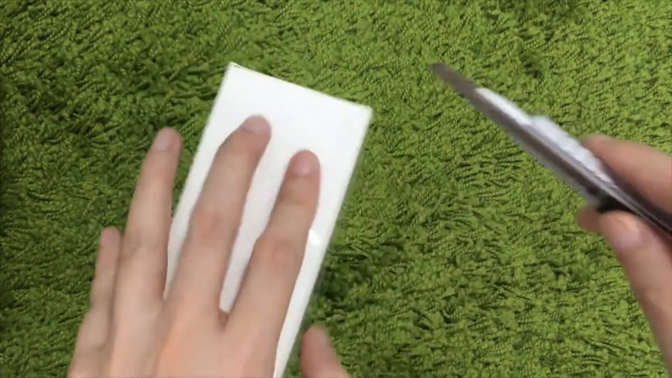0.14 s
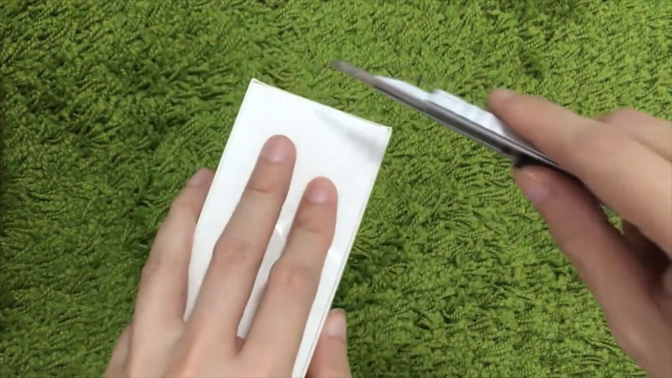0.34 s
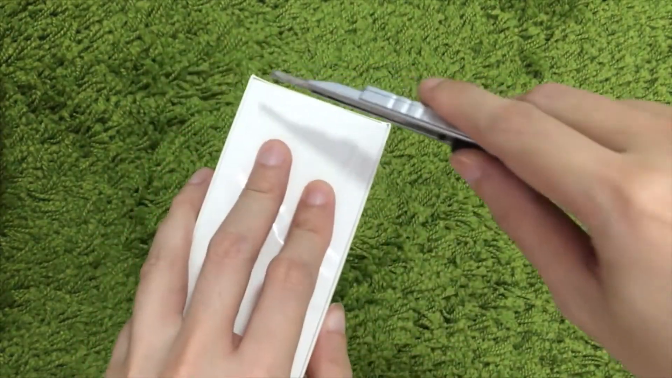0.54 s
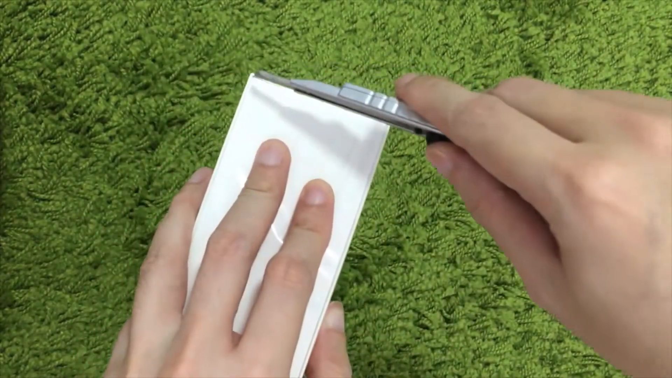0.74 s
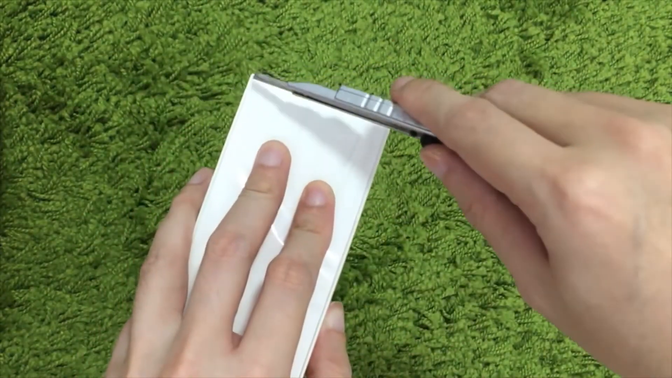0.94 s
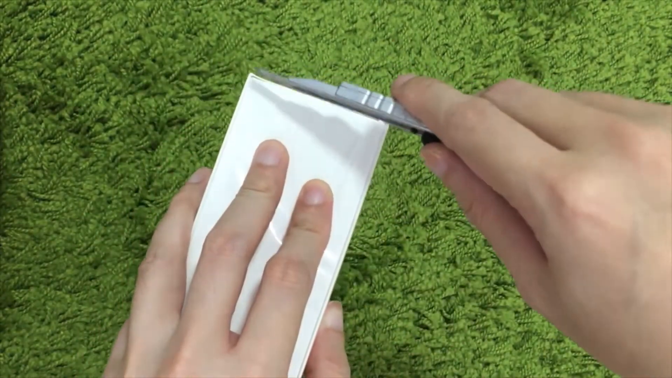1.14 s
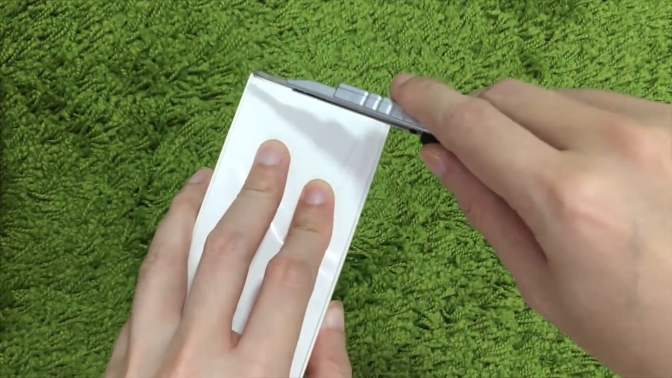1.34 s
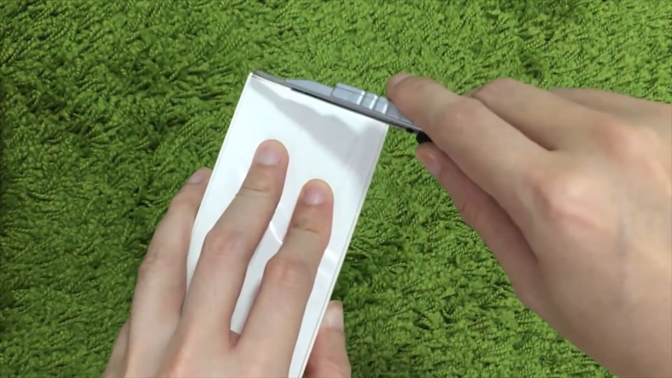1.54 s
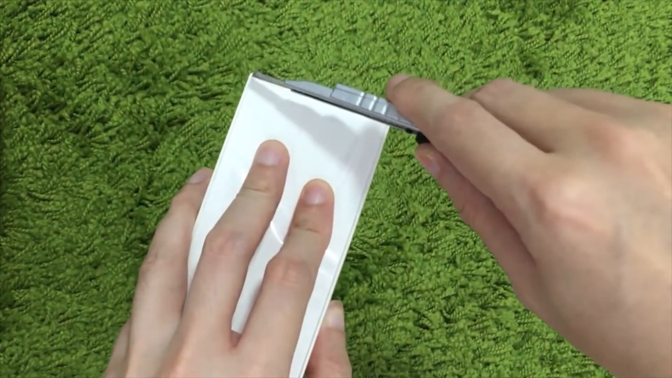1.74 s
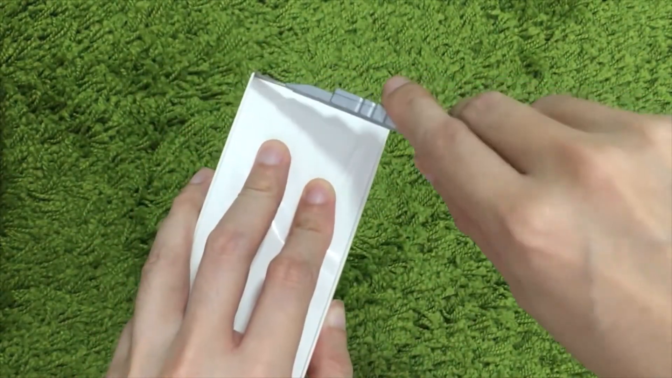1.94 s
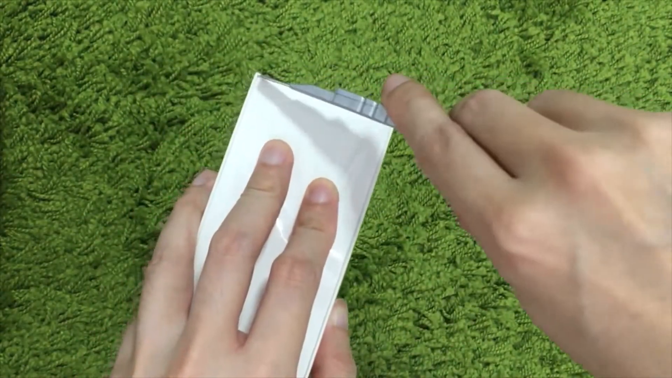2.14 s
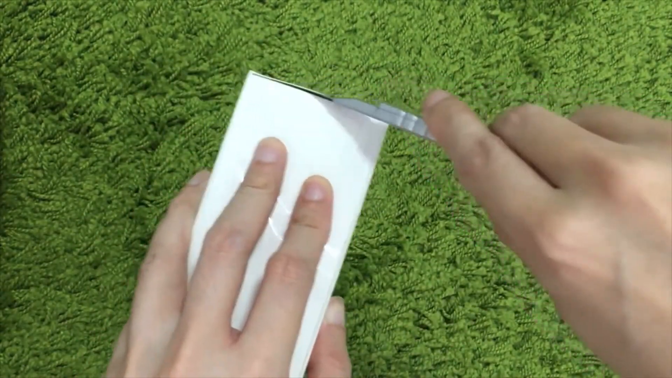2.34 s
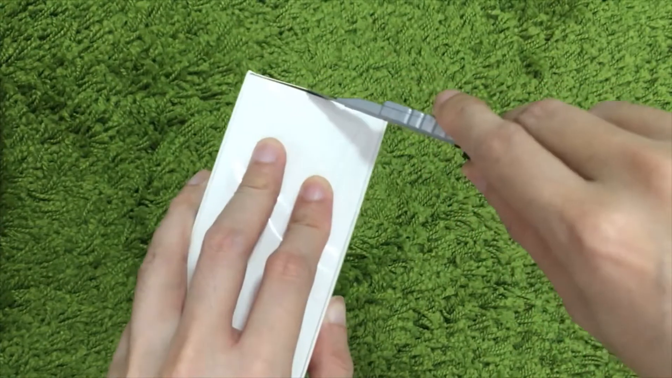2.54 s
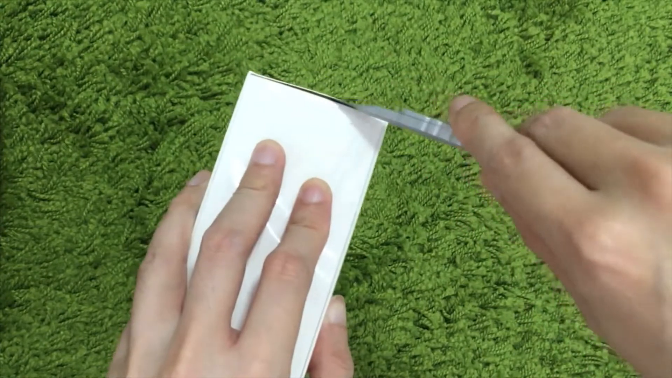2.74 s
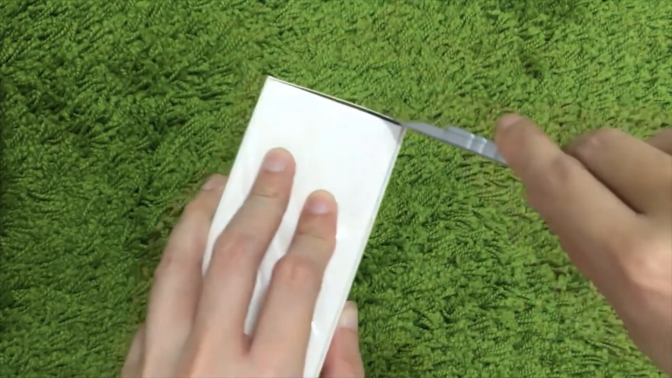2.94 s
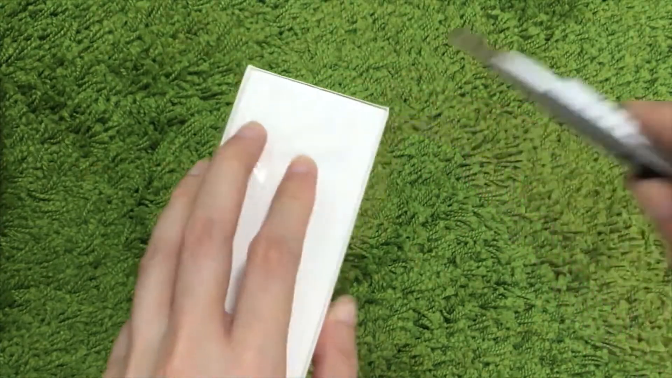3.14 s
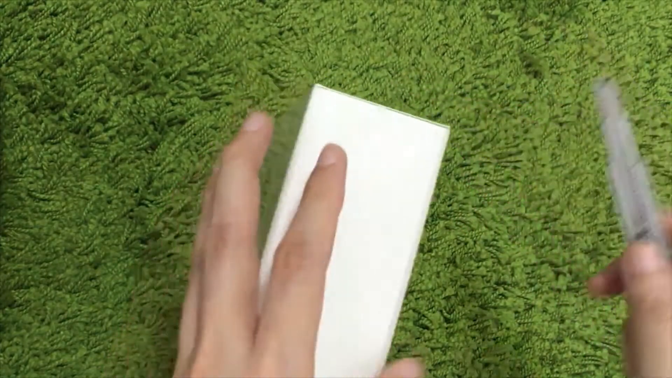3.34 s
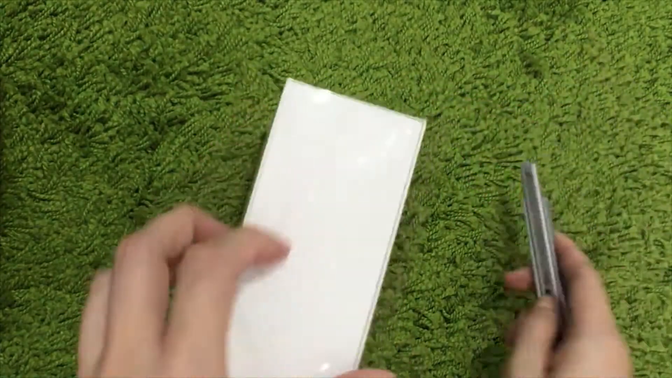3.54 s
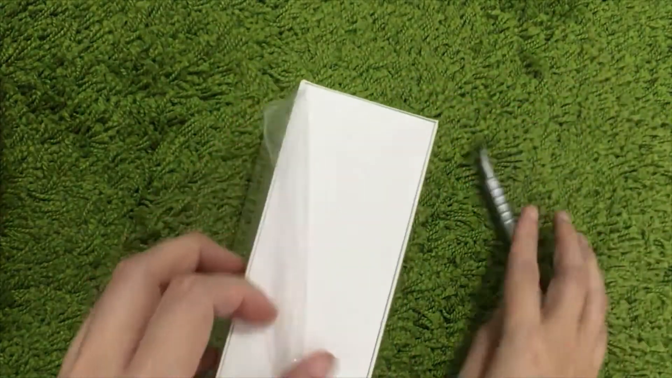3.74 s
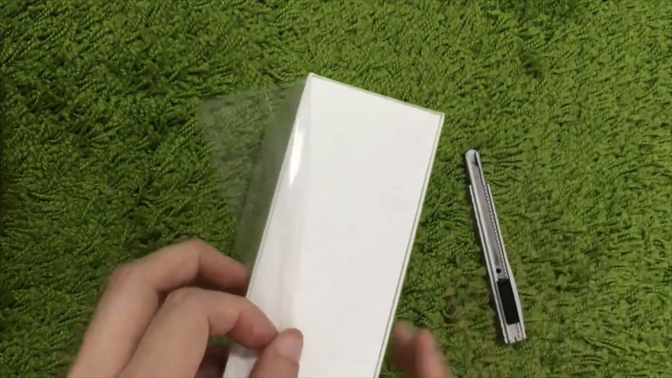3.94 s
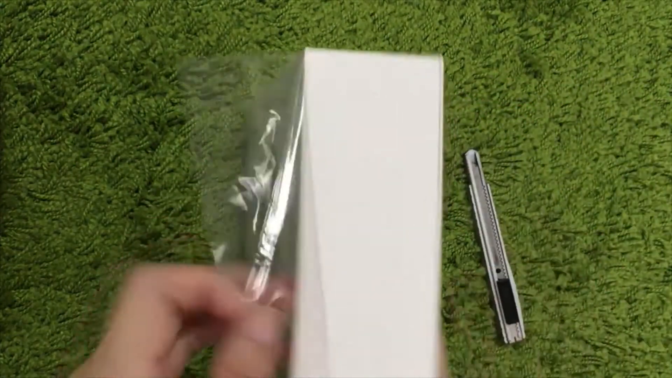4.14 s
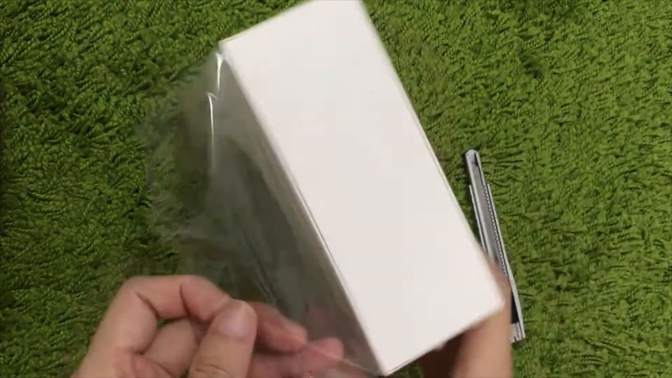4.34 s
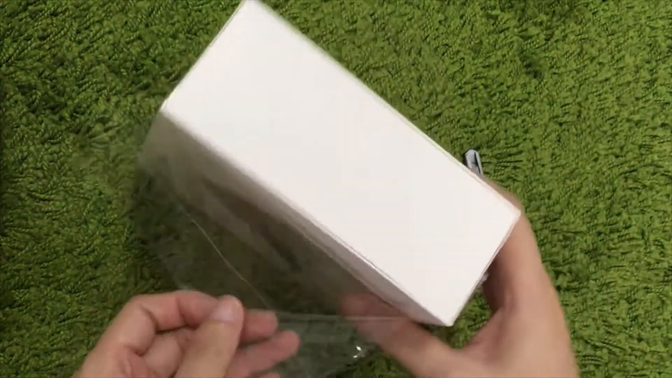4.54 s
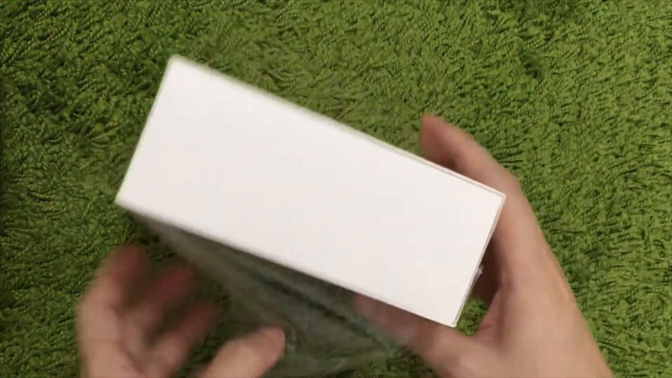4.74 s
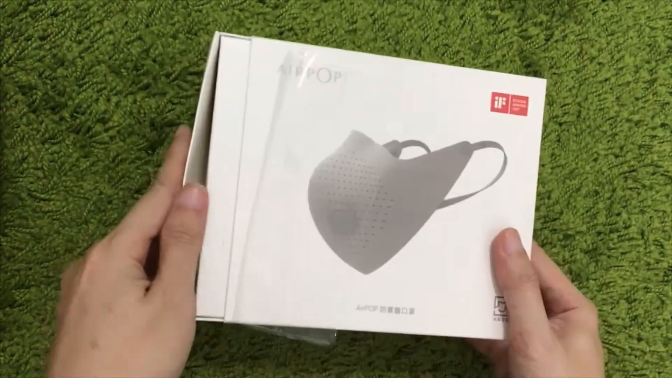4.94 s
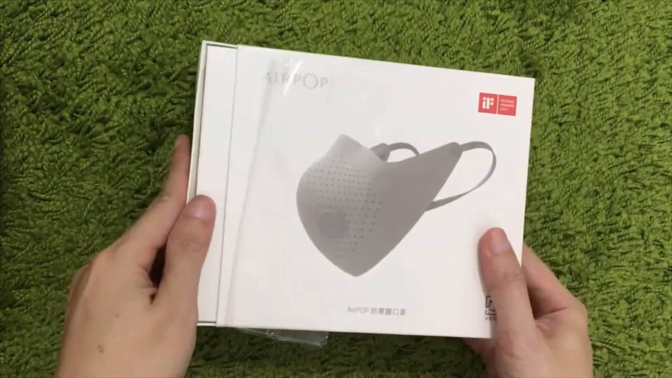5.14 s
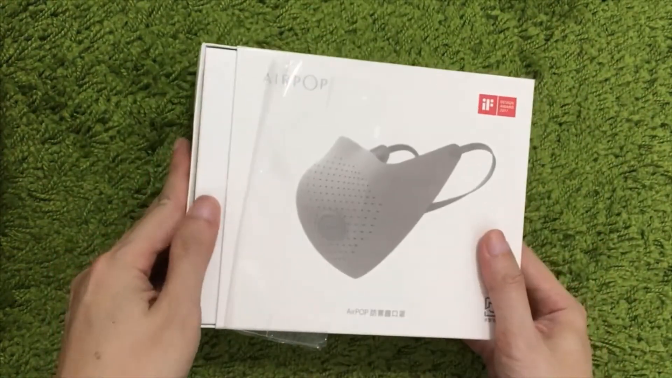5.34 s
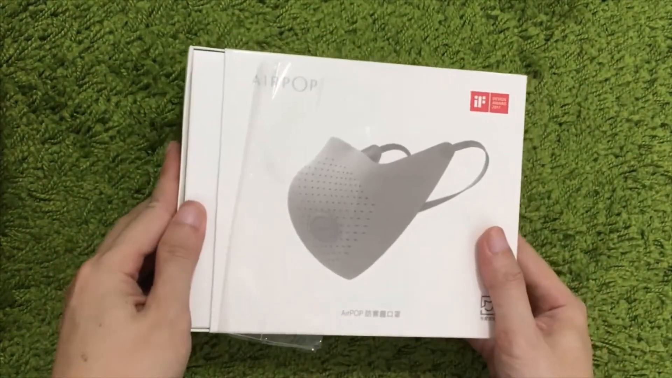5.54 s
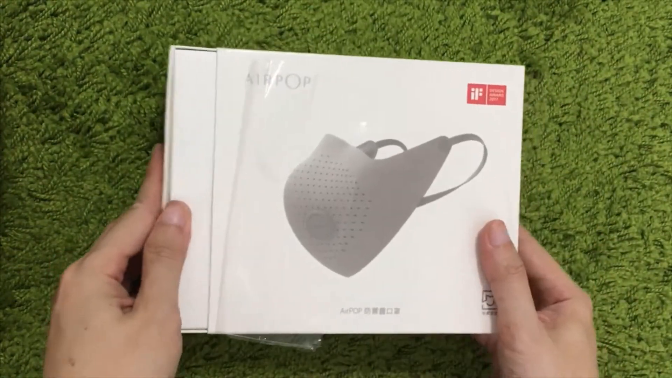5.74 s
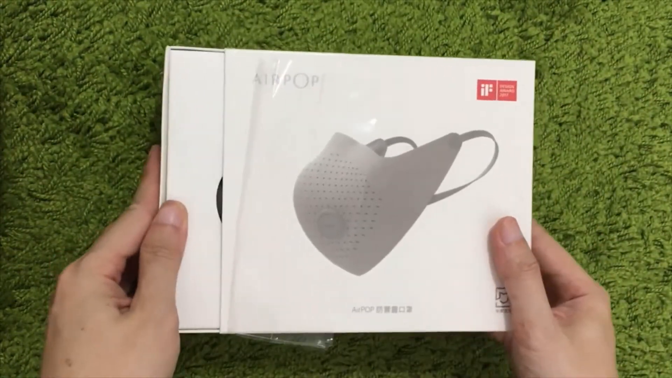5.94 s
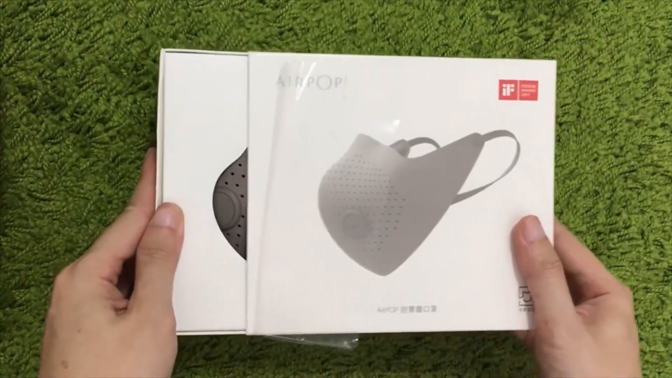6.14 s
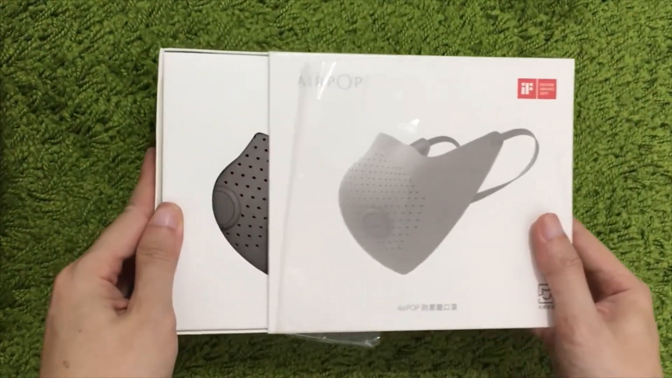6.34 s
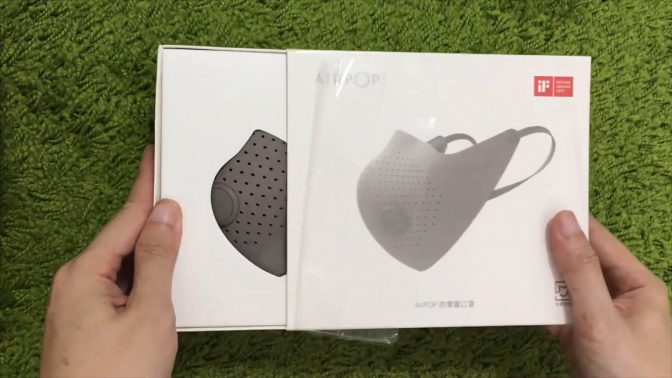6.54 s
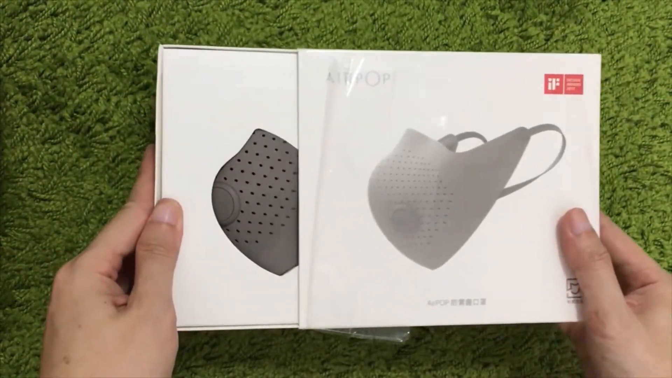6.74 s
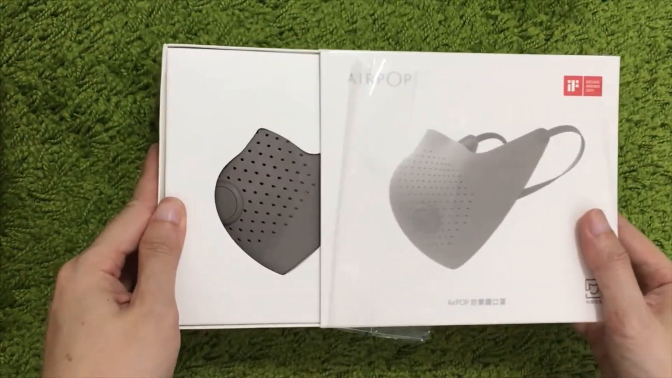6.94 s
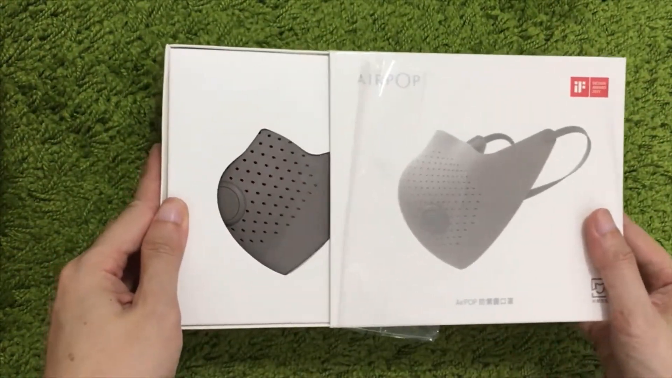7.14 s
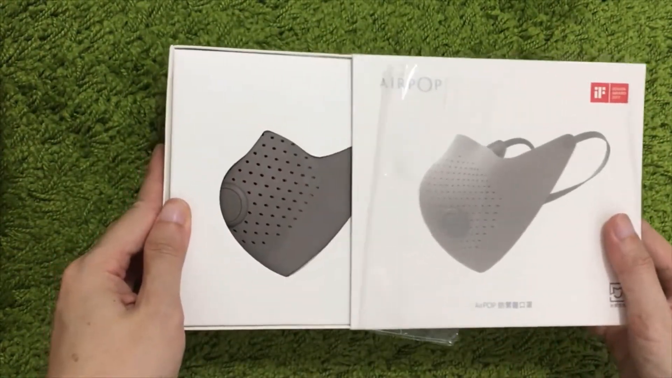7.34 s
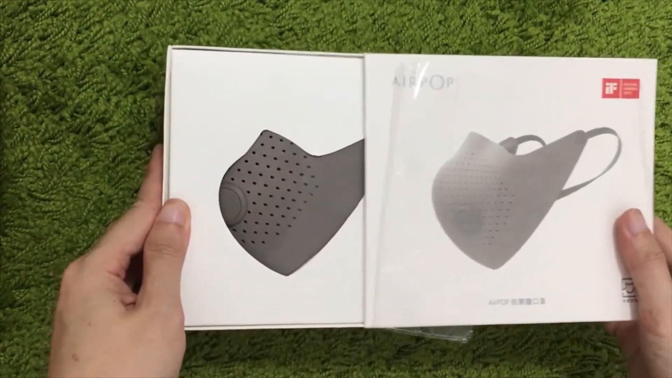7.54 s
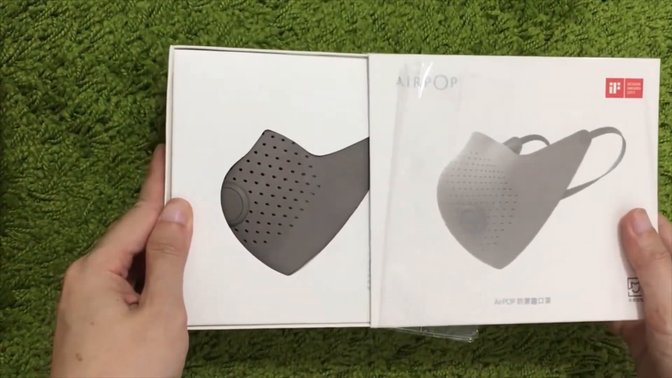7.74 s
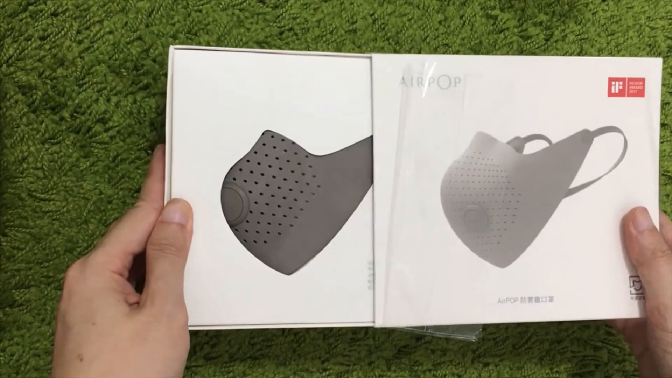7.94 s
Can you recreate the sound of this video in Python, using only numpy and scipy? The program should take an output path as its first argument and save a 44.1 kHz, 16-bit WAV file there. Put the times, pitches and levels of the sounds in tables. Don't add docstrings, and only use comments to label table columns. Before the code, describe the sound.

A close microphone in a small, quiet room picks up soft hiss and a deep traffic drone that swells and fades. At 0 s there is a dull thump with a small crunch, then mostly quiet with faint ticks, one short metallic ring near 1 s. Around 1.85-1.95 s small snaps appear; at 2.15-2.25 s a knife sticks and slips in a tight crackling burst, with another at 2.7 s ending in a hard snap at 2.78 s. Light film crackle runs from 3 s. At 3.39-3.51 s the blade slider ratchets in about ten loud, bright clicks, slowing at the end. From 3.6 to 4.8 s plastic film snaps and crackles crisply, strongest near 4.1 s, with muffled box knocks. Distant bird whistles fall at 4.9, 5.3 and 6.0 s. A soft knock comes at 5 s; from 5.7 to 8 s the card sleeve hisses in short, gentle, uneven pushes.

```python
import sys
import numpy as np
from scipy import signal
from scipy.fft import rfft, irfft
from scipy.io import wavfile
from scipy.ndimage import uniform_filter1d

SR = 44100
rng = np.random.default_rng(int(sys.argv[2]) if len(sys.argv) > 2 else 0)


def put_to_file(sound):
    columns = np.atleast_2d(sound).T
    safe = np.clip(columns, -1, 1)
    whole_steps = np.round(safe * 32767)
    wavfile.write(sys.argv[1], SR, whole_steps.astype(np.int16))


def undo_db(level):
    steps = np.asarray(level, float) / 20
    return 10 ** steps


N = 356769


def rms_one(x):
    return x / np.sqrt(np.mean(x ** 2) + 1e-20)


def in_time(rows, outside):
    s, *columns = np.transpose(rows)
    return [np.interp(np.arange(N) / SR, s, column, outside, outside) for column in columns]


def band(x, low_hz, high_hz):
    edges = [low_hz, min(high_hz, .47 * SR)]
    return signal.sosfilt(signal.butter(2, edges, "band", fs=SR, output="sos"), x)


def coloured(x, spectrum):
    hz, db = np.transpose(spectrum)
    bins_hz = np.maximum(np.arange(N // 2 + 1) * SR / N, 1)
    gain = undo_db(np.interp(np.log(bins_hz), np.log(hz), db))
    return rms_one(irfft(rfft(x) * gain, N))


def drift(rate_hz):
    r = np.exp(-32 * np.pi * rate_hz / SR)
    noise = rng.standard_normal(N // 16 + 3002)
    slow = signal.lfilter([1], [1, -2 * r, r * r], noise)[3000:]
    return np.interp(np.arange(N) / 16, np.arange(len(slow)), rms_one(slow))


def ring(x, hz, t60):
    r, w = undo_db(-60 / (t60 * SR)), 2 * np.pi * hz / SR
    return signal.lfilter([0, np.sin(w)], [1, -2 * r * np.cos(w), r * r], x + 1e-18)


def resonance(x, hz, width_hz):
    r = np.exp(-np.pi * width_hz / SR)
    poles = [1, -2 * r * np.cos(2 * np.pi * hz / SR), r * r]
    return signal.lfilter([(1 - r * r) / 2, 0, (r * r - 1) / 2], poles, x)


def bursts(count, length_ms, rise_ms):
    t_ms = np.arange(1800) / SR * 1000
    chance = rng.standard_normal((count, 1801))
    length = length_ms * undo_db(2 * chance[:, :1])
    return chance[:, 1:] * (1 - np.exp(-t_ms / rise_ms)) * np.exp(-t_ms / length)


def grains(per_s, spread_db):
    sizes = undo_db(spread_db * np.minimum(rng.exponential(1, N), 5)) * rng.choice([-1, 1], N)
    return rms_one(sizes * (rng.random(N) < per_s / SR))


def place(times, levels_db, shapes):
    size = shapes.shape[1]
    out = np.zeros(N + size)
    crest = np.sqrt(2 * uniform_filter1d(shapes ** 2, size=40).max(axis=1))
    for s, gain, shape in zip(times, undo_db(levels_db) / crest, shapes):
        start = round(s * SR)
        out[start:start + size] += gain * shape
    return out[:N]


def strikes(table, regions):
    s, *levels = np.transpose(table)
    out = np.zeros(N)
    for db, (low_hz, high_hz, ms, trim_db, modes, t60) in zip(levels, regions):
        burst = bursts(len(s), ms, rise_ms=0.27)
        strengths = undo_db(-32.0 + 1.0 * rng.standard_normal((len(s), len(modes))))
        ringing = sum(strengths[:, [k]] * ring(burst, hz, t60) for k, hz in enumerate(modes))
        out += place(s, db + trim_db, band(burst + ringing, low_hz, high_hz))
    return out


def card(x, panels, wander_db):
    out = np.zeros(N)
    for k, (hz, width_hz, db) in enumerate(panels):
        out += (-1) ** k * undo_db(db + wander_db * drift(25)) * resonance(x, hz, width_hz)
    return rms_one(out)


def narrow_noise(table, levels_db):
    out = np.zeros(N)
    for (start, end, hz, width_hz), db in zip(table, levels_db):
        at, size = round(start * SR), round((end - start) * SR)
        noise = rng.standard_normal(size + SR // 4)
        narrow = resonance(resonance(noise, hz, width_hz), hz, width_hz)[-size:]
        out[at:at + size] += undo_db(db) * signal.windows.tukey(size, .5) * rms_one(narrow)
    return out


# (time [s], crest of blade modes [dB], crest of film [dB])
SEAM_SLIPS = [(2.157, -54, -49), (2.168, -54, -50), (2.1925, -41.5, -38), (2.198, -43, -44),
              (2.2255, -36, -50), (2.231, -37, -48), (2.2385, -34.5, -48), (2.2465, -32, -44),
              (2.698, -52, -56), (2.7108, -46.5, -52), (2.7228, -55, -64), (2.7278, -48, -55),
              (2.7308, -52, -55), (2.735, -49, -58), (2.7458, -54, -58), (2.7528, -51, -56),
              (2.7565, -49, -53), (2.761, -51, -58), (2.7795, -32.5, -36)]
# (low [Hz], high [Hz], burst [ms], trim [dB], ringing modes [Hz], T60 [s])
SEAM_REGIONS = [
    (860, 1100, 1.4, -10, (1030,), 0.016),
    (1620, 2100, 1.5, -4.5, (1880,), 0.015),
    (2840, 3900, 1.1, -1.5, (3150, 3400), 0.011),
    (5500, 7500, .8, -1, (6300, 6900), .006),
]


def slit():
    blade_thrice_then_film = [0, 1, 1, 1, 2]
    return strikes(np.array(SEAM_SLIPS)[:, blade_thrice_then_film], SEAM_REGIONS)


# (low [Hz], high [Hz], burst [ms], trim [dB], ringing modes [Hz], T60 [s])
SNAP_REGIONS = [
    (1020, 2600, 0.99, -1.5, (1360, 2500), 0.0067),
    (2440, 3870, 0.94, -2, (2560, 3230, 3700, 4400), 0.01),
    (4400, 7160, 0.57, -1, (7200, 11000, 4700), 0.006),
    (8050, 19000, 0.81, 7, (10000, 20000), 0.0046),
]
# (time [s], crest [dB], centre [octaves above the card panel region])
BOX_JOLTS = [(.017, -30.5, 1.2), (.0884, -47.5, .1), (.2456, -51.5, 1.7), (1.8636, -58, .5),
             (2.1964, -41, 1.6), (2.2304, -36, 1.5), (2.2385, -33.5, 1.5), (2.2463, -37, 0.45),
             (2.7792, -24, 2.36), (3.003, -58, 1.5), (3.1645, -44, 3.1), (3.2217, -43.5, 3.4),
             (3.308, -54, 1.6), (3.9732, -26, 4), (3.9814, -26.5, 2.6), (4.0058, -42, 0.6),
             (4.1116, -23, 2.9), (4.1133, -22.5, 2.5), (4.1238, -30, 2.5), (4.162, -33.5, 2.7),
             (4.2461, -38, 1.5), (4.3012, -35.5, 1.1), (4.3534, -35, 2.9), (4.411, -42.5, .1),
             (4.6946, -35.5, 1.9), (4.8273, -48.5, 0.087), (4.944, -50, .1), (4.976, -54, 0.18),
             (5.729, -43.5, .1), (5.956, -46, .1), (3.113, -59, 2), (3.1925, -48, 0.42), (3.2545, -57, 1.5),
             (4.4525, -48, 1.7), (4.7895, -52, 2.5), (5.8, -57, 0.29), (4.2975, -45, 1.1),
             (4.423, -49, 1.7)]
# (time [s], crest [dB], centre [octaves above card panel])
FILM_CRACKS = [(1.8466, -45, 1.9), (1.9097, -36, 1.8), (2.167, -42, 2.4), (2.1929, -33, 2),
               (2.2254, -36, 1.2), (2.797, -42, 1.6), (2.9968, -51, 1.7), (3.0115, -41, 2),
               (3.0782, -38, 2.8), (3.2073, -39, 3), (3.6903, -28, 2.76), (3.6951, -34, 2.5),
               (3.7165, -39, 1.2), (3.7357, -25, 3.1), (3.8062, -32.5, 3.3), (3.934, -40, 3.3),
               (3.957, -39, 1), (3.965, -38, 3.8), (4.0373, -50, 1.9), (4.1446, -38, 2.6),
               (4.315, -36, 3.1), (4.3316, -27, 2.3), (4.4895, -40, 0.13), (4.6048, -39.5, 1.5),
               (4.7557, -36, 1.5), (4.7621, -38, 1), (4.7753, -50, 1.4), (5.7043, -43, 1.5),
               (6.1687, -54, 0.075), (6.174, -56, .1), (7.602, -51.5, 2.5), (3.0265, -48, 2),
               (3.065, -49, 1.4), (3.1005, -50.5, 3.3), (4.1405, -38, 2.2), (4.1265, -32, 2.8),
               (4.3115, -46, 1.5), (4.4665, -50, 2.4), (4.6865, -53, 1.2), (4.767, -44, 2.8),
               (4.7815, -46, 1.8), (2.1455, -58, 2.3), (3.877, -54, 2.8), (3.922, -48, 3.1),
               (3.961, -40.5, 2.8)]
# (time [s], crest [dB], centre [octaves above card panel])
FILM_TICKS = [(.2095, -41.5, 2.6), (.972, -52, 2.6), (1.8544, -53, 1.7), (1.9396, -50.5, 1.1),
              (2.156, -46, 1.7), (2.402, -58, 1.6), (2.525, -58, 1.7), (2.5517, -60, 0.99),
              (2.759, -45, 2.2), (2.8328, -45.5, 2.9), (3.0226, -43, 2.4), (3.0398, -41.5, 2.9),
              (3.0929, -48, 2.9), (3.1156, -45, 2.9), (3.1442, -50, 3.1), (3.174, -44.5, 2.5),
              (3.329, -38, 2.3), (3.576, -25, 2.93), (3.656, -46, 1.6), (3.7239, -27, 3.4),
              (3.816, -33, 1.84), (3.9068, -35.5, 2), (3.941, -35.5, 2.9), (4.226, -47, 1),
              (4.2797, -42, 2.9), (4.3414, -39, 2.9), (4.381, -36, 3.1), (4.3866, -41.5, 2.9),
              (7.8165, -54.5, 0.84), (4.2365, -48, 3.3), (4.328, -52, 2.3), (4.432, -54, 2.3),
              (4.7415, -45, 2.9), (4.7725, -51, 2.6), (3.0605, -47, 3.2)]
# (below [dB per octave], above [dB per octave])
JOLT_LOSS, CRACK_LOSS, TICK_LOSS = (3.7, 3.6), (9, 9.8), (18, 7.2)


def snap_levels(table, loss):
    s, db, centre = np.transpose(table)
    away = np.arange(len(SNAP_REGIONS))[:, None] - centre
    return np.transpose([s, *(db - np.maximum(-away * loss[0], away * loss[1]))])


def snaps():
    jolts = snap_levels(BOX_JOLTS, JOLT_LOSS)
    cracks = snap_levels(FILM_CRACKS, CRACK_LOSS)
    ticks = snap_levels(FILM_TICKS, TICK_LOSS)
    return strikes(np.vstack([jolts, cracks, ticks]), SNAP_REGIONS)


# (time [s], frequency [Hz], crest [dB], T60 [s])
CLEAR_RINGS = [(0.9715, 2590, -38.5, 0.016), (.972, 4450, -42, 0.008), (.972, 5240, -42.5, 0.012),
               (1.847, 3160, -51, 0.011), (1.846, 4400, -46.5, 0.0093), (1.91, 3430, -39, 0.0071),
               (1.91, 4420, -40, 0.009), (2.402, 5360, -53, .01), (2.403, 3100, -56, .012),
               (2.5505, 4160, -57, .008), (2.552, 2900, -55.5, .008), (2.525, 4800, -57, .008),
               (3.1455, 15500, -34, .006), (2.7793, 5650, -27, 0.014), (3.0115, 2530, -38.5, 0.015),
               (3.0155, 2750, -40, 0.014), (2.804, 1100, -51, .01), (3.378, 13500, -46.5, .002),
               (3.689, 2260, -35, 0.023), (5.004, 2250, -50, 0.011), (4.951, 1410, -45, 0.01),
               (3.011, 4430, -45, .015), (3.2605, 5600, -51, 0.0065), (4.7, 2900, -48, .006),
               (4.3, 3700, -42.5, .01), (5.345, 1340, -55, .012), (5.611, 1000, -57, .012),
               (5.706, 2600, -48, .012), (5.731, 1540, -51, .012), (6.166, 1420, -46, 0.017),
               (5.5, 2200, -55, .01), (6.17, 800, -50.5, .015), (4.112, 597, -39, .025),
               (4.6, 620, -46, .02), (4.024, 880, -46, .03), (4.006, 1200, -46, .015),
               (4.776, 540, -51, .015), (4.696, 1550, -48, 0.014), (4.298, 1460, -45, .008),
               (3.163, 1900, -47, .01), (3.174, 1100, -48, .01), (3.208, 2200, -50, .008),
               (2.9, 2300, -48, .01), (3.078, 2000, -52, .01), (4.142, 1540, -39, .02),
               (4.331, 3100, -34, .006)]


def rings():
    s, hz, db, t60 = np.transpose(CLEAR_RINGS)
    hits = bursts(len(s), 0.92, rise_ms=0.37)
    shapes = [resonance(ring(hit, f, t), f, .5 * f) for hit, f, t in zip(hits, hz, t60)]
    return place(s, db, np.array(shapes))


# (time [s], peak [dB])
RATCHET_TEETH = [
    (3.39, -13.5),
    (3.3992, -16),
    (3.4082, -16),
    (3.4178, -15),
    (3.4265, -12),
    (3.4353, -14),
    (3.4487, -13.5),
    (3.4715, -15.5),
    (3.4955, -17),
    (3.5118, -18),
]
# (frequency [Hz], level [dB])
KNIFE_MODES = [(1380, -20), (2250, -22), (2700, 5), (3500, -21), (4500, -4), (5750, 11), (6100, 8),
               (7600, -7.5), (9000, 6), (9500, 10), (11500, -0.5), (13300, 14.5), (14600, -10)]
# (frequency [Hz], level against the tooth [dB], delay [ms])
LEAD_MODES = [
    (9100, -4, .6),
    (5600, -2, 1.1),
    (9040, -4, .8),
    (9000, -4, .6),
    (13270, 1.5, .9),
    (9300, -7.5, .5),
    (6000, -5.5, .6),
    (6000, -4.5, .8),
    (5870, 0, .6),
    (8970, -5, .5),
]
# (time [s], crest [dB])
HANDLE_ANSWERS = [
    (3.3913, -32.5),
    (3.4015, -32),
    (3.412, -30.5),
    (3.4218, -27.5),
    (3.4372, -34),
    (3.4508, -27.5),
    (3.474, -33.5),
    (3.4971, -34),
]


def ratchet():
    s, db = np.transpose(RATCHET_TEETH)
    count = len(s)
    modes = 0
    for hz, level_db in KNIFE_MODES:
        strength = undo_db(level_db - 24 + rng.normal(0, 4, (count, 1)))
        modes = modes + strength * ring(bursts(count, .95, rise_ms=.9), hz, .3 / np.sqrt(hz))
    rattle = bursts(count, 1.15, rise_ms=.9)
    teeth = band(band(modes + rattle, 3200, 19000), 1600, 20000) + undo_db(-17) * band(rattle, 800, 2400)
    rebound_s = s + rng.uniform(0.002, 0.0045, count)

    lead_hz, lead_db, delay_ms = np.transpose(LEAD_MODES)
    hits = bursts(count, .35, rise_ms=.15)
    leads = np.array([band(ring(hit, hz, 0.005), .6 * hz, 19000) for hit, hz in zip(hits, lead_hz)])

    late_s, late_db = np.transpose(HANDLE_ANSWERS)
    handle = ring(bursts(len(late_s), 0.98, rise_ms=0.52), hz=2645, t60=0.013)
    out = place(s, db - 0.5, teeth) + place(rebound_s, db - 13, teeth[::-1])
    out += place(s + delay_ms / 1000, db + lead_db, leads)
    return out + place(late_s, late_db, band(handle, 1900, 4000))


# (time [s], film level [dB])
FILM_HANDLING = [(2.9, -81), (2.99, -57), (3.07, -60.5), (3.19, -61), (3.25, -74), (3.38, -67), (3.54, -61),
                 (3.62, -62), (3.74, -53.5), (3.87, -59), (4.03, -55.5), (4.08, -62), (4.32, -55),
                 (4.64, -60.5), (4.79, -59.5), (4.82, -75), (4.95, -70), (5.6, -84)]
# (start [s], end [s], film level [dB], card body level [dB])
FILM_CRUNCHES = [(0.01, 0.052, -80, -67), (0.084, 0.105, -65, -80), (0.197, 0.346, -76, -80),
                 (1.905, 1.94, -73, -79), (2.15, 2.162, -52.5, -70), (2.163, 2.176, -53, -70),
                 (2.173, 2.192, -58, -70), (2.186, 2.204, -41.5, -56), (2.203, 2.224, -57, -67),
                 (2.22, 2.25, -46, -56), (2.713, 2.78, -61, -72), (2.785, 2.814, -55, -65),
                 (2.99, 3.03, -62, -65), (3.127, 3.172, -60, -88), (3.187, 3.221, -55, -67),
                 (3.327, 3.336, -52, -58), (3.72, 3.745, -49, -59), (3.808, 3.834, -55, -76),
                 (3.932, 3.95, -48, -60), (3.95, 4.015, -48, -51), (4.093, 4.11, -47.5, -63),
                 (4.11, 4.12, -50, -41), (4.119, 4.148, -49, -47.5), (4.268, 4.287, -57, -66),
                 (4.727, 4.748, -60, -80), (4.753, 4.786, -53, -60), (6.158, 6.18, -79.5, -63),
                 (4.93, 4.986, -82, -72), (5.338, 5.346, -74, -66)]
# (frequency [Hz], level [dB per Hz])
FILM_COLOUR = [(1500, -43), (2500, -14), (4500, 0.5), (8000, 0), (15000, 2), (17000, 6)]
# (frequency [Hz], width [Hz], level [dB])
CARD_PANELS = [(710, 150, -6), (1000, 200, -5), (1360, 220, -3), (2150, 240, 0), (2600, 350, -3),
               (3300, 450, -2), (4300, 900, -15)]


def rustle():
    handling_db, = in_time(FILM_HANDLING, outside=-150)
    film = undo_db(handling_db)
    body = undo_db(-66.5 + .6 * (handling_db + 60))
    t = np.arange(N) / SR
    for start, end, film_db, body_db in FILM_CRUNCHES:
        span = slice(round(start * SR), round(end * SR))
        fade = np.clip(np.minimum(t[span] - start, end - t[span]) / 0.0022, 0, 1)
        film[span] += undo_db(film_db) * fade
        body[span] += undo_db(body_db) * fade
    cracks = grains(9000 * undo_db(3.0 * drift(66)), spread_db=1.8)
    return film * coloured(cracks, FILM_COLOUR) + body * card(cracks, CARD_PANELS, wander_db=2.0)


# (start [s], end [s], hiss at start [dB], hiss at end [dB])
SLEEVE_PUSHES = [(5.698, 5.734, -58, -52), (5.957, 6.08, -59.5, -65.5), (6.08, 6.163, -66, -66),
                 (6.208, 6.404, -64.5, -62.5), (6.434, 6.611, -73.5, -67.5), (6.62, 6.72, -78, -80),
                 (6.743, 6.819, -60.5, -60), (7.022, 7.062, -70, -67), (7.157, 7.247, -63, -57),
                 (7.457, 7.514, -58, -60), (7.916, 7.923, -63, -63.5), (8.08, 8.09, -66.5, -61.5)]
# (frequency [Hz], level [dB per Hz])
FRICTION_COLOUR = [(1500, -3), (2800, -5), (4000, 6), (6700, 1.5), (11000, 0.5), (17000, -2.5)]
# (frequency [Hz], width [Hz], level [dB])
SLEEVE_PANELS = [(713, 170, -4), (1040, 125, -2.5), (1343, 177, -0.5), (2120, 215, 0.5), (2444, 150, -2.5),
                 (2710, 250, -4), (3330, 370, -7), (5070, 110, -5), (6350, 610, -17.5)]
START_DB_PER_S, STOP_DB_PER_S = 457, 408


def slide():
    t = np.arange(N) / SR
    hiss_db = np.full(N, -np.inf)
    for start, end, *ends_db in SLEEVE_PUSHES:
        push_db = np.interp(t, (start, end), ends_db)
        push_db -= START_DB_PER_S * np.maximum(start - t, 0)
        push_db -= STOP_DB_PER_S * np.maximum(t - end, 0)
        hiss_db = np.maximum(hiss_db, push_db)
    body_db = -59.5 + 0.54 * (hiss_db + 60)
    rub = grains(8000, spread_db=-0.5) * undo_db(0.66 * drift(32.0))
    hiss = undo_db(hiss_db) * coloured(rub, FRICTION_COLOUR)
    return hiss + undo_db(body_db) * card(rub, SLEEVE_PANELS, wander_db=2.1)


# (time [s], crest of box air [dB], crest of box walls [dB])
RUG_KNOCKS = [(0.015, -34.5, -41.5), (2.198, -35.5, -46), (2.247, -34.5, -44), (2.78, -31, -38.5),
              (3.478, -40, -61), (3.523, -37.5, -62), (3.955, -44, -43), (3.982, -37.5, -49),
              (4.004, -52, -48), (4.113, -34, -35), (4.143, -34.5, -40.5), (4.244, -43, -48),
              (4.295, -51, -44), (4.351, -50, -46), (4.378, -48, -52), (4.488, -45, -50), (4.776, -60, -51),
              (4.015, -42, -54), (4.824, -43.5, -46), (5.001, -35, -45), (5.727, -43, -49),
              (5.911, -42.5, -53), (6.166, -45, -48)]
# (low [Hz], high [Hz], burst [ms], trim [dB], ringing modes [Hz], T60 [s])
BOX_REGIONS = [
    (127, 354, 5.7, 0.92, (182, 252.6, 324), 0.048),
    (294.8, 1000, 4.4, 0.61, (412, 673, 985), 0.017),
]


def knocks():
    return strikes(RUG_KNOCKS, BOX_REGIONS)


# (start [s], length [s], from [Hz], to [Hz], level [dB])
BIRD_CALLS = [
    (4.942, 0.17, 3850, 2100, -65),
    (5.298, 0.145, 3580, 2200, -65),
    (6.004, 0.035, 3410, 2000, -62),
]
GLIDE_BEND = 0.3
SAG_AT, SAG_WIDTH, SAG_DB = .68, .07, -6


def bird():
    out, t = np.zeros(N), np.arange(N) / SR
    for start, length, from_hz, to_hz, db in BIRD_CALLS:
        part = np.clip((t - start) / length, 0, 1)
        sag_db = SAG_DB * np.exp(-((part - SAG_AT) / SAG_WIDTH) ** 2)
        swell = np.sin(np.pi * part) ** 0.46 * undo_db(sag_db)
        fallen = part - GLIDE_BEND * np.sin(2 * np.pi * part) / (2 * np.pi)
        phase = 2 * np.pi * np.cumsum(from_hz + (to_hz - from_hz) * fallen) / SR
        out += swell * undo_db(db + 3.0 * drift(170)) * np.sin(phase)
    return out


# (start [s], end [s], frequency [Hz], width [Hz])
FAINT_TONES = [(.52, .82, 233, 3), (.33, .46, 1040, 30), (.34, .46, 3200, 150), (1.81, 1.91, 6250, 200),
               (2.595, 2.67, 6400, 250), (2.46, 2.505, 5450, 250), (3.635, 3.69, 1200, 60),
               (3.71, 3.93, 215, 25), (5.89, 5.93, 3700, 100), (1.093, 1.105, 2200, 400),
               (1.097, 1.113, 3150, 500), (1.095, 1.113, 5400, 900), (5.61, 5.64, 5050, 60),
               (5.44, 5.48, 2400, 90), (5.345, 5.4, 3100, 60)]
FAINT_TONES_DB = [-55, -72, -77, -72, -74, -78, -61, -57.5, -74, -62.5, -67, -66.5, -77, -69, -71]


def faint_tones():
    return narrow_noise(FAINT_TONES, FAINT_TONES_DB)


# (time [s], drone level near 45 Hz [dB])
TRAFFIC_RUMBLE = [(0, -60), (.25, -49.5), (.6, -47.5), (1.2, -56), (1.87, -48), (2.5, -53), (4.0, -54),
                  (4.44, -48), (4.7, -66), (4.84, -43.5), (5.2, -50), (5.6, -50.5), (5.88, -43.5),
                  (6.56, -45), (6.92, -44), (7.2, -53.5), (8.09, -49)]
# (frequency [Hz], level [dB per Hz])
ROOM_COLOUR = [(15, -46.5), (25, -7), (44, -2), (86, -2.5), (144, -14), (160, -17.5), (233, -19.5),
               (260, -30), (297, -22.5), (359, -28.5), (848, -36.5), (970, -34), (3000, -48), (4500, -52.5),
               (15500, -54)]


def background():
    drone = resonance(band(rng.standard_normal(N), 30, 57), 44, 14)
    drone_db, = in_time(TRAFFIC_RUMBLE, outside=-52)
    air = coloured(rng.standard_normal(N), ROOM_COLOUR)
    air = signal.sosfilt(signal.butter(4, 58, "high", fs=SR, output="sos"), air)
    return undo_db(drone_db) * rms_one(drone) + undo_db(-49.5) * rms_one(air)


def room(x):
    t = np.arange(SR // 2) / SR
    t60_s = 0.19
    tail = rng.standard_normal(len(t)) * undo_db(-60 * t / t60_s) * (t > .003)
    treble = band(tail * undo_db(-60 * t / .5), 4700, 17000)
    tail = band(tail, 250, 6700) + treble
    return signal.fftconvolve(x, tail / np.sqrt(np.sum(tail ** 2)))[:N]


def scene():
    near = slit() + snaps() + rings() + ratchet() + rustle() + slide() + knocks()
    far = bird()
    echo = room(undo_db(-14.5) * near + far)
    return (near + far + echo + faint_tones() + background())[None]


def roll_off(x):
    return signal.sosfilt(signal.butter(12, 17000, fs=SR, output="sos"), x)


# (time [s], edge [Hz], depth [dB])
TREBLE_DROPOUTS = [(0.002, 2600, -14), (1.620, 1800, -10), (1.922, 7000, -9), (2.344, 3000, -15),
                   (2.770, 4500, -8), (3.007, 7000, -5), (3.155, 1500, -12), (3.614, 450, -35),
                   (4.072, 2600, -11), (4.626, 2000, -9), (4.920, 3000, -14), (5.373, 3500, -12),
                   (6.547, 2930, -15), (7.295, 1300, -12), (7.507, 900, -10)]
# (start [s], end [s], frequency [Hz], width [Hz])
LEFT_BANDS = [(3.6, 3.638, 1200, 60), (3.602, 3.638, 8900, 60), (3.602, 3.638, 11100, 60),
              (3.602, 3.638, 12400, 60), (4.612, 4.635, 1600, 60), (4.612, 4.64, 5900, 60),
              (4.612, 4.635, 8600, 60), (3.135, 3.17, 14100, 80), (7.495, 7.525, 2350, 50),
              (7.495, 7.53, 7050, 50), (7.283, 7.31, 3150, 50)]
LEFT_BANDS_DB = [-67, -65, -65, -70, -67, -70, -77, -50, -64, -68, -77]
# (frequency [Hz], width [Hz], share removed [0-1])
MICROPHONE_DIPS = [(5000, 600, .35), (10400, 1000, .35)]


def record(dry):
    out, t = dry.copy(), np.arange(N) / SR
    for s, edge_hz, depth_db in TREBLE_DROPOUTS:
        span = slice(max(round((s - .05) * SR), 0), round((s + .05) * SR))
        half_s = .0145 if depth_db < -30 else .0095
        gap = np.clip((half_s - np.abs(t[span] - s)) / .005, 0, 1) * (1 - undo_db(depth_db))
        treble = signal.sosfiltfilt(signal.butter(4, edge_hz, "high", fs=SR, output="sos"), dry[:, span])
        out[:, span] -= gap * treble
    out += narrow_noise(LEFT_BANDS, LEFT_BANDS_DB)
    for hz, width_hz, share in MICROPHONE_DIPS:
        out = out - min(share, .9) * resonance(out, hz, width_hz)
    out = signal.sosfilt(signal.butter(8, 36.5, "high", fs=SR, output="sos"), out)

    top = signal.sosfiltfilt(signal.ellip(8, .05, 45, 15850, "high", fs=SR, output="sos"), out)
    loud = np.clip(uniform_filter1d(top ** 2, size=400) / undo_db(-116) - 1, 0, 1)
    gated = out - top * (1 - undo_db(-26.5) * loud)
    mix = signal.sosfilt(signal.cheby2(16, 70, 17200, fs=SR, output="sos"), gated)
    return roll_off(mix)


dry = scene()
out = record(dry)
put_to_file(out)
```